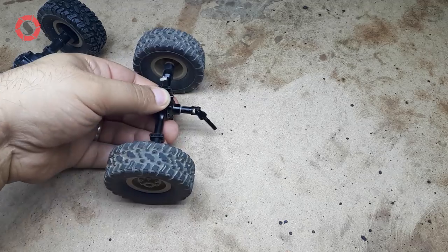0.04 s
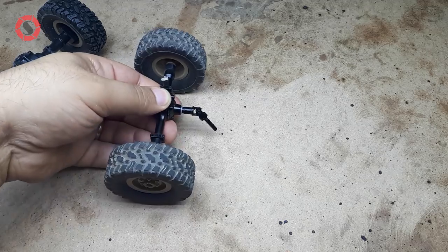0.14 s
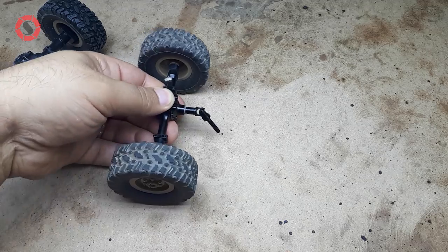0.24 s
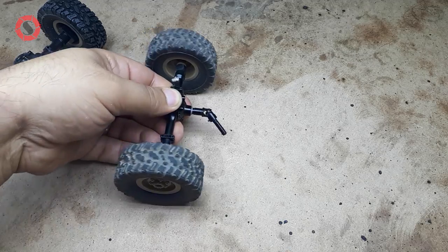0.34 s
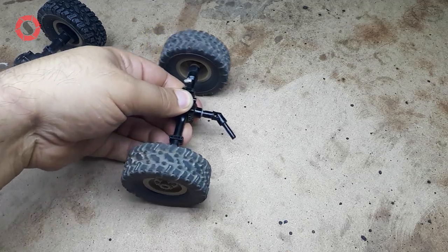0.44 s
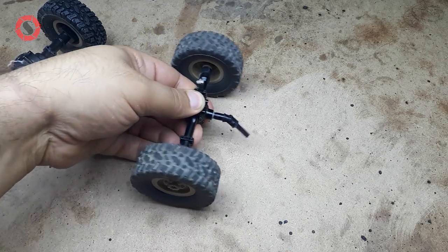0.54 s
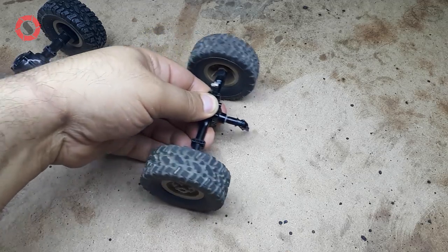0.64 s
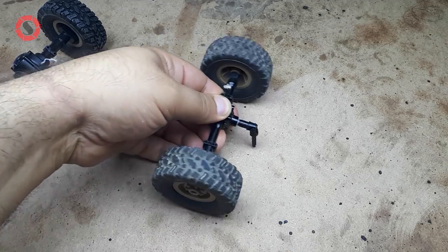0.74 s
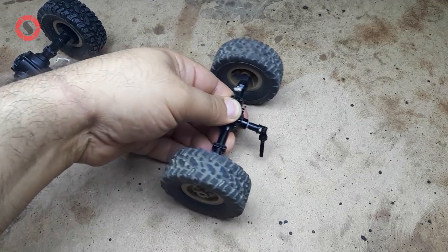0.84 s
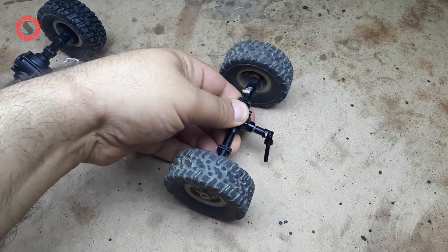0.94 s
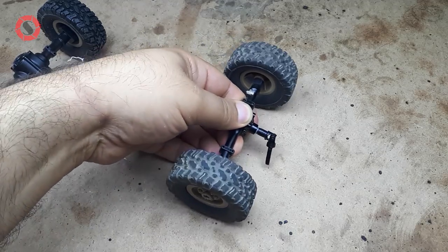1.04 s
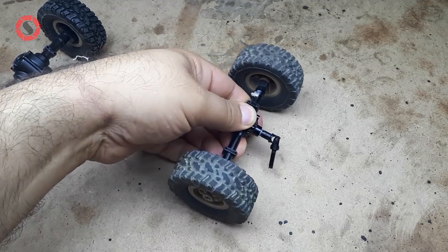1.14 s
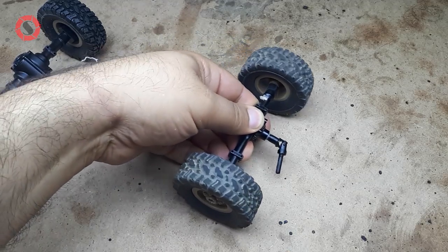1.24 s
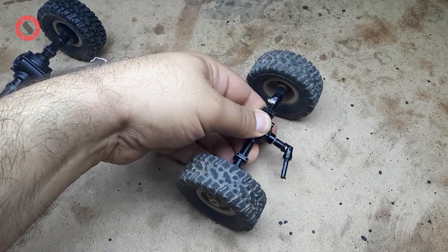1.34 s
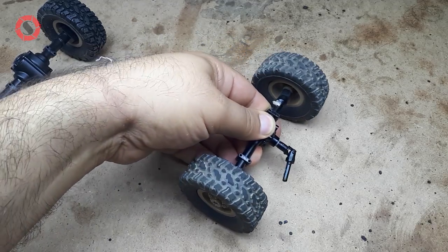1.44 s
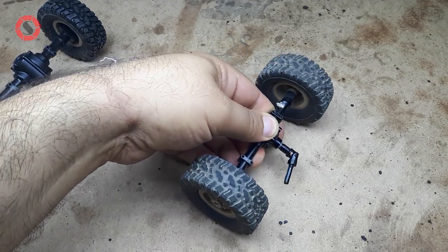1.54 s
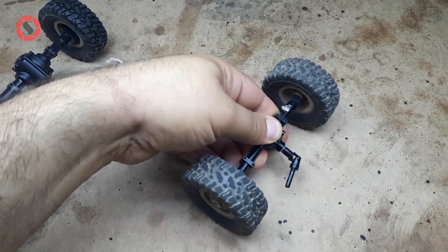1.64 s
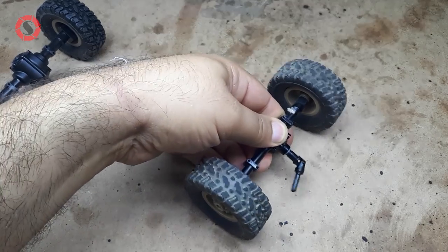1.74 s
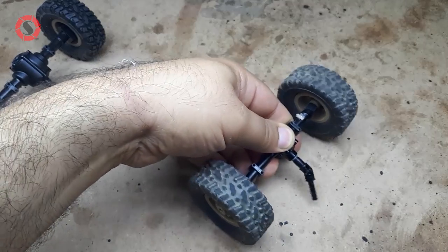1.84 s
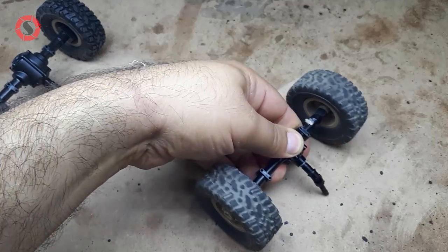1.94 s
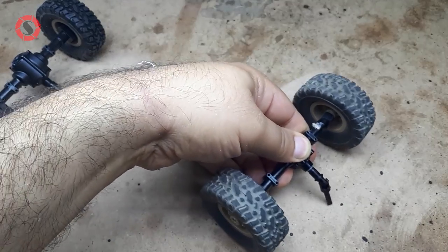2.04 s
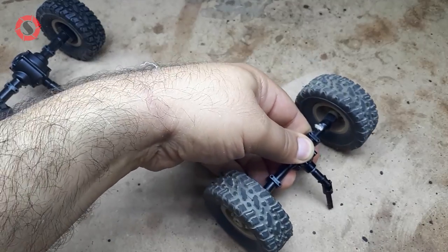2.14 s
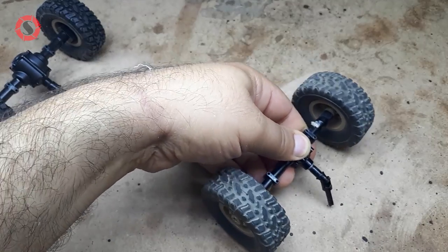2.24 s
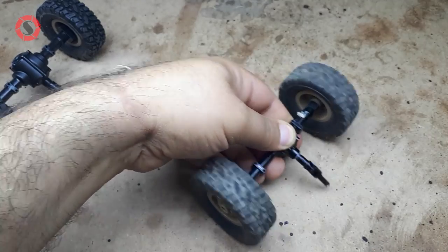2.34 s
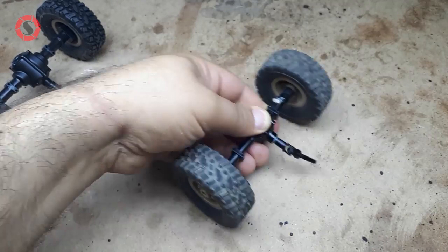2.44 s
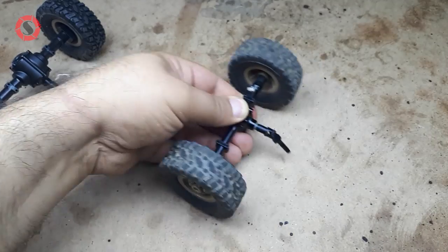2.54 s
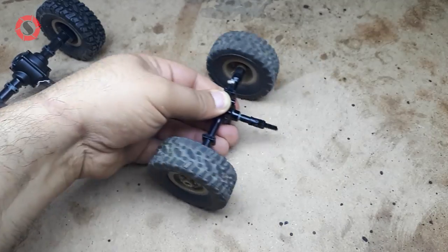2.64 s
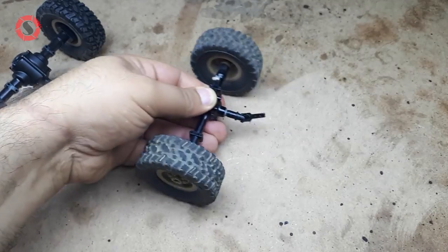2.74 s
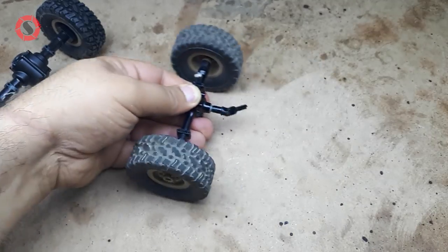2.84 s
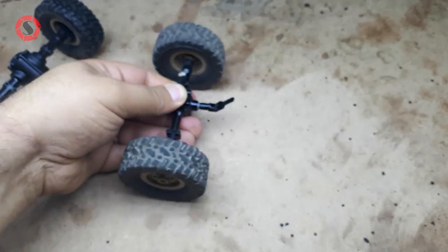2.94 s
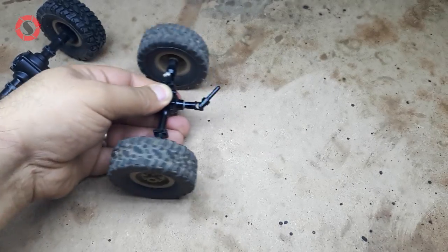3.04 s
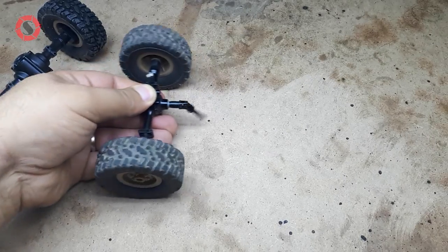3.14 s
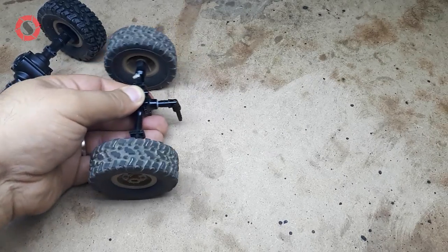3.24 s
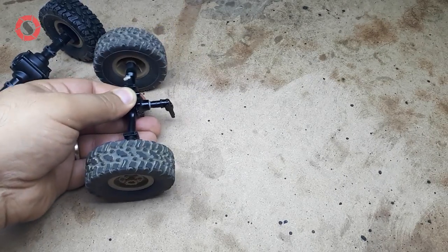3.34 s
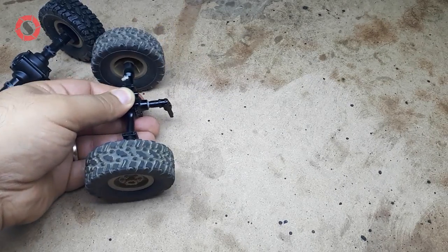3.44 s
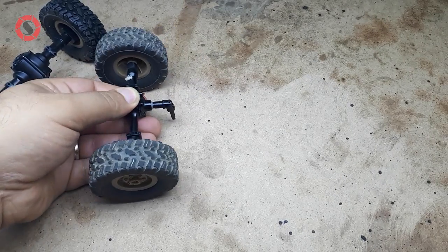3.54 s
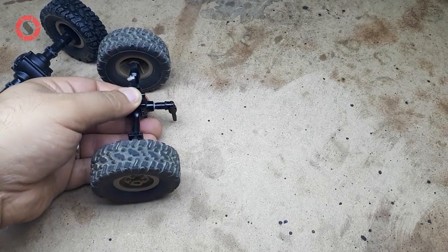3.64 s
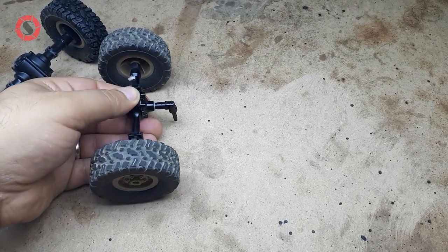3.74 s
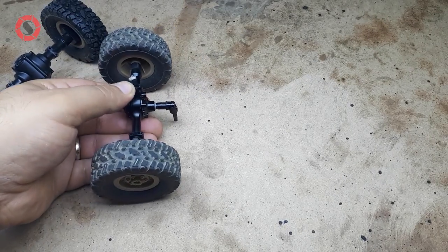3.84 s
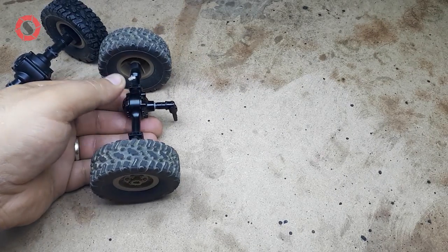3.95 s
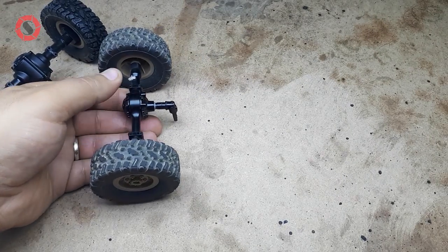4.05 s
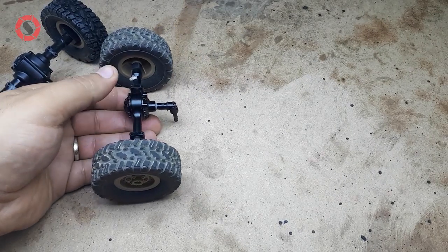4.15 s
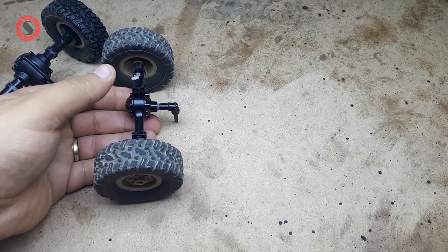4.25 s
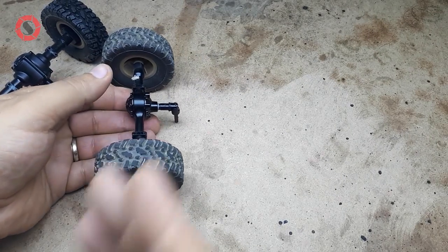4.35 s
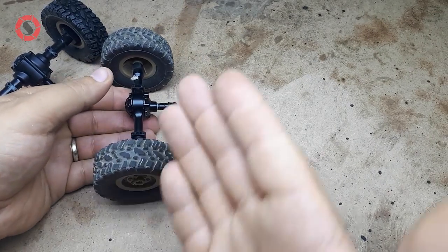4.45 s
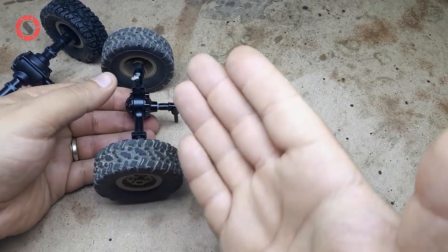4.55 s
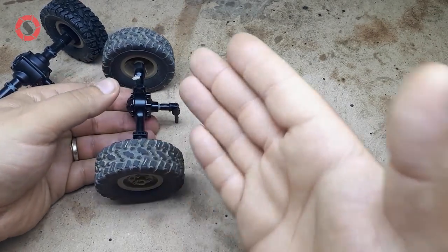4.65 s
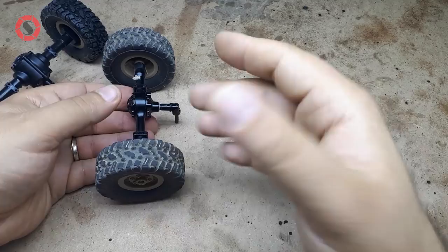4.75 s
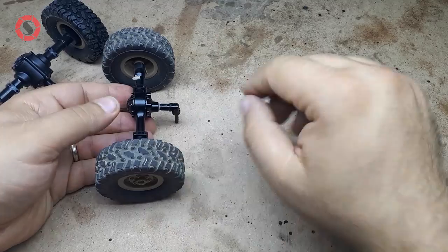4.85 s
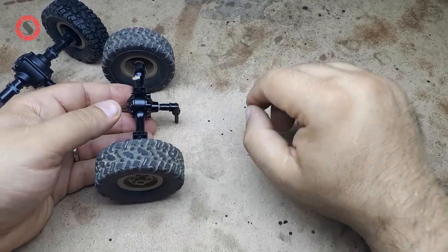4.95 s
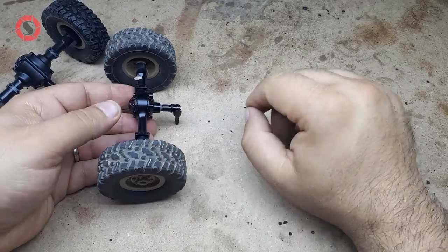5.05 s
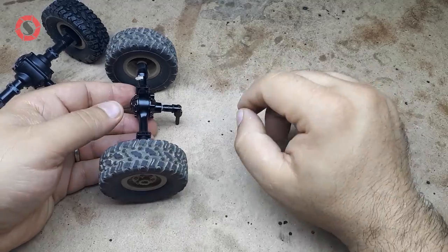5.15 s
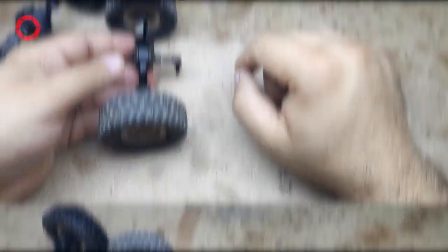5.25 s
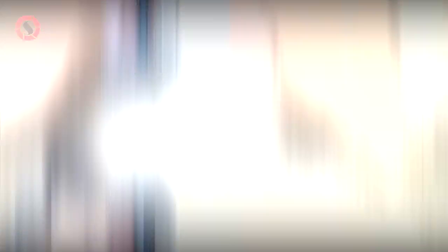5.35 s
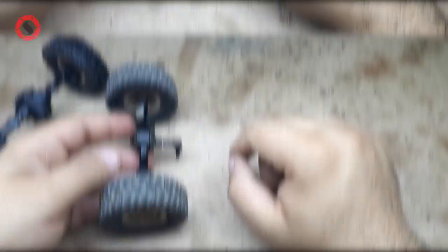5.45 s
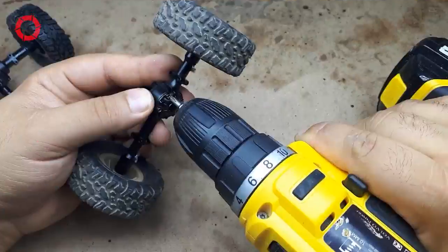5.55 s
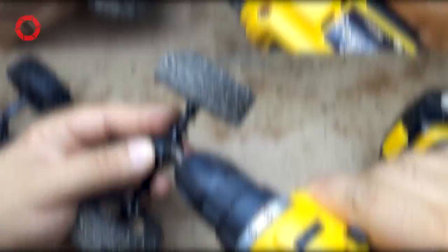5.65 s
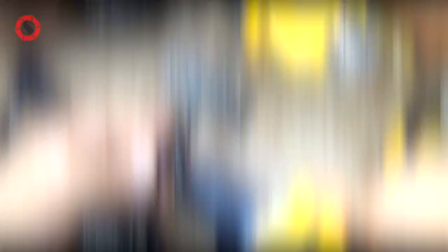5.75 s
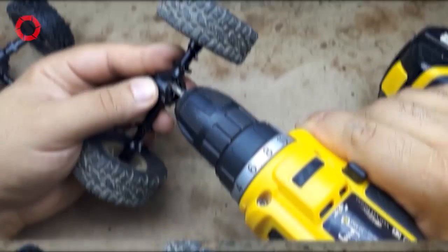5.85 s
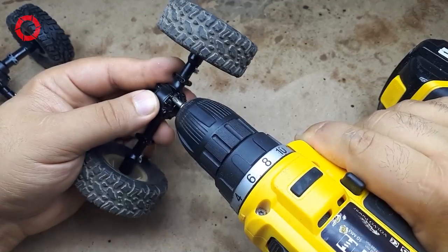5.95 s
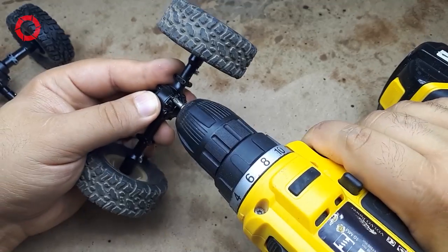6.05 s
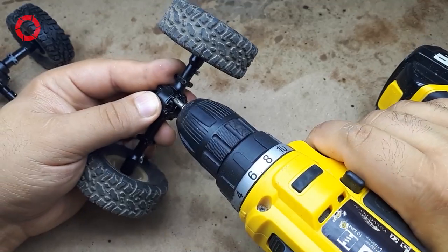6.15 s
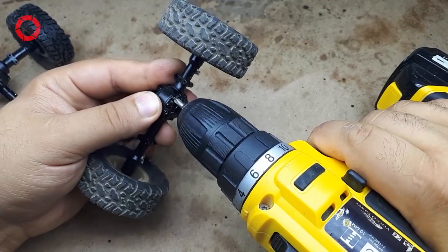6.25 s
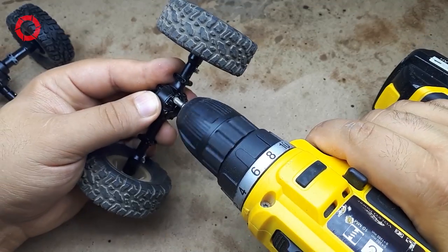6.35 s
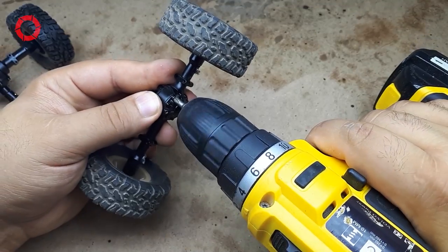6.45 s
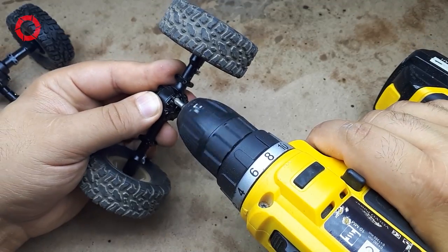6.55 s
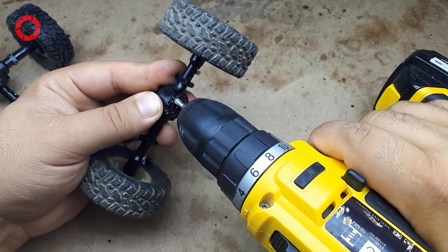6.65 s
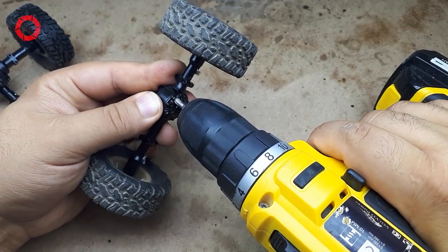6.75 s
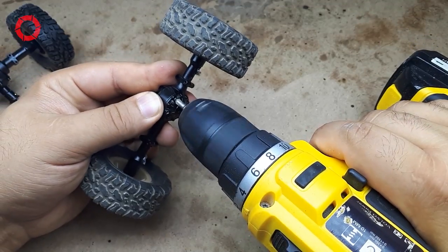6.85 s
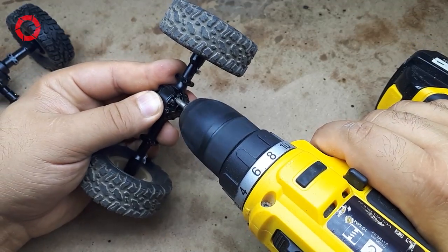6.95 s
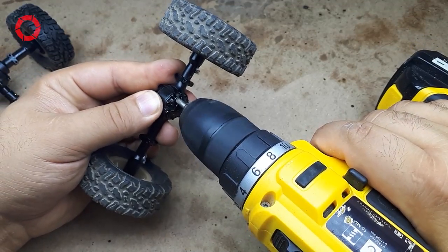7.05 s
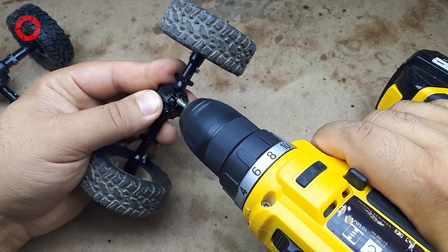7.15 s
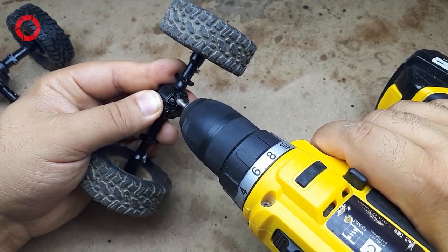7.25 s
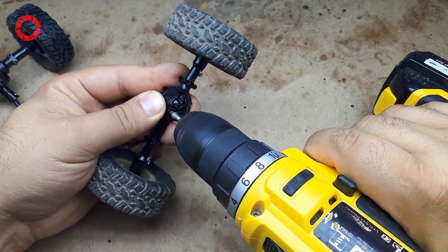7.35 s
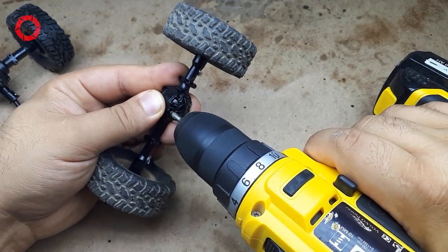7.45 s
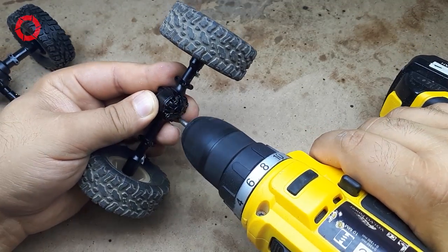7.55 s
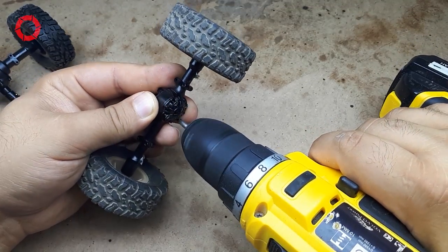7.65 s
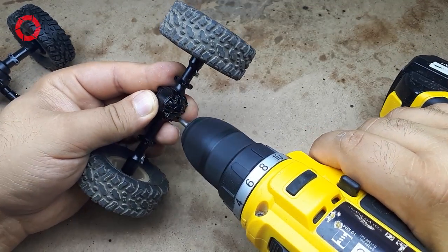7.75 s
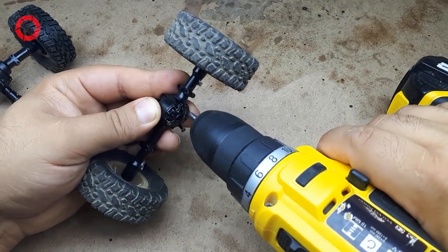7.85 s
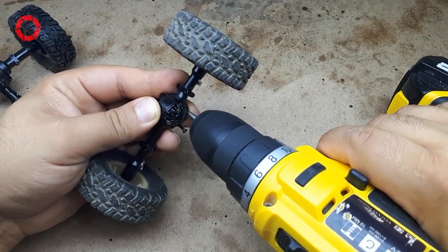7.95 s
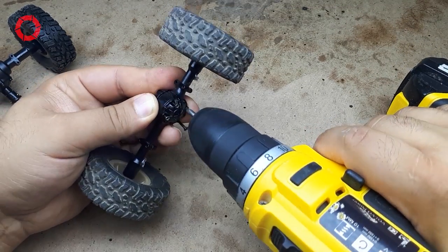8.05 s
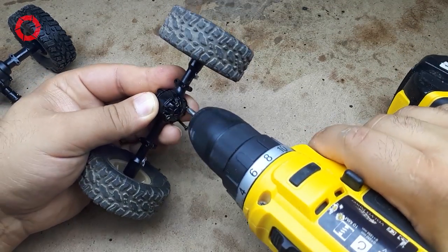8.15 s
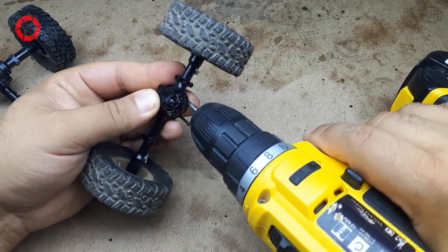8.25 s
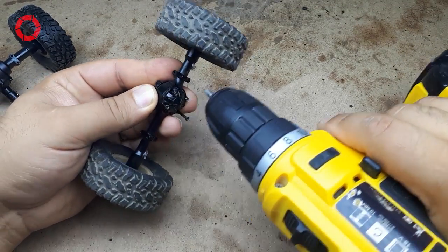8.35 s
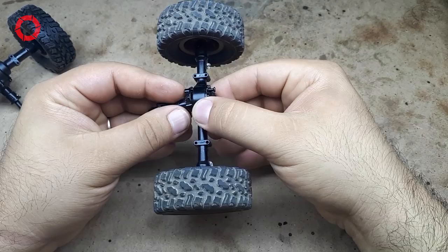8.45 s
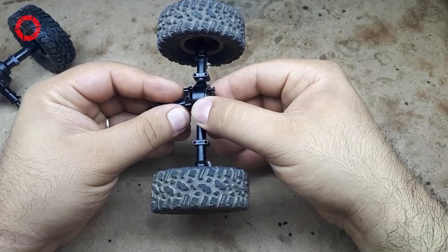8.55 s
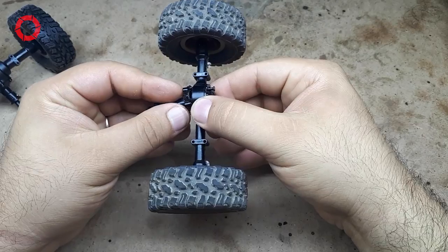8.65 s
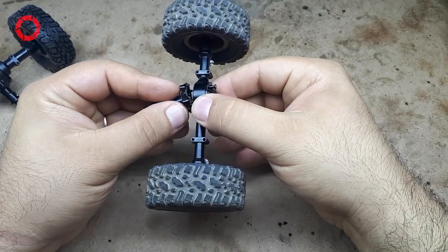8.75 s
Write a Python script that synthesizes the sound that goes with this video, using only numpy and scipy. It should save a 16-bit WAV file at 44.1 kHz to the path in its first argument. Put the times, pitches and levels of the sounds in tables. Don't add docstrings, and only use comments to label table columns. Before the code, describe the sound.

In a small room with a hard floor, hands quietly roll and drag a toy axle: grainy tyre rubs, tiny clicks, a faint squeak. Sharper knocks rattle its loose parts, then a cordless drill ticks, sings thinly and accelerates into a loud, gear-rattling whine. Abrupt cuts change its pitch before it brakes with a clunk, leaving near silence. Close stereo phone pickup, with a low hum behind.

```python
import sys
import numpy as np
from scipy import signal
from scipy.fft import rfft, irfft, next_fast_len
from scipy.io import wavfile
from scipy.ndimage import uniform_filter1d

SR = 44100
rng = np.random.default_rng(int(sys.argv[2]) if len(sys.argv) > 2 else 0)


def generate_wav(sig):
    pcm = np.round(np.clip(np.atleast_2d(sig).T, -1, 1) * 32767).astype(np.int16)
    wavfile.write(sys.argv[1], SR, pcm)


def gain_from_db(level_db):
    decades = np.asarray(level_db, float) / 20
    return 10 ** decades


N = 388060
TIME = np.arange(N) / SR
PORT_LAG_S, HANDS_LAG_S = 0.00018, 0.0001
ROOM_T60_S = 0.12


def curves(table, t):
    s, *columns = np.transpose(table)
    return [np.interp(t, s, c) for c in columns]


def unit(x):
    return x / np.sqrt(np.mean(x ** 2))


def colour(x, spectrum):
    size = next_fast_len(x.shape[-1])
    hz, db = np.transpose(spectrum)
    bins_hz = np.arange(size // 2 + 1) * SR / size
    gain = gain_from_db(np.interp(np.log(bins_hz + 1), np.log(hz), db))
    return irfft(rfft(x, size) * gain, size)[..., :x.shape[-1]]


def band(x, lo_hz, hi_hz, order=2):
    edges = [lo_hz, min(hi_hz, .45 * SR)]
    return signal.sosfilt(signal.butter(order, edges, "bandpass", fs=SR, output="sos"), x)


def resonate(x, modes):
    return sum(gain_from_db(db) * band(x, f - w / 2, f + w / 2, order=1) for f, w, db in modes)


def walk(rate, size):
    k = int(SR / rate)
    steps = np.repeat(rng.standard_normal(size // k + 1), k)
    return unit(uniform_filter1d(uniform_filter1d(steps, k), k)[:size])


def grains(per_s, spread_db):
    chance = np.clip(per_s / SR, 0, 1)
    size = rng.standard_normal(len(chance)) * gain_from_db(spread_db * rng.standard_normal(len(chance)))
    return unit((rng.random(len(chance)) < chance) * size / np.sqrt(chance))


def swells(rows, t, rise, drop_db, shape=1):
    power, coarse = 0, t[::32]
    for s, length, db in rows:
        away = np.where(coarse < s, (s - coarse) / rise, (coarse - s) / (1 - rise)) / length
        power = power + gain_from_db(2 * (db - drop_db * away ** shape))
    return np.interp(t, coarse, np.sqrt(power))


def in_room(x, wet_db, lag_s=0):
    t = np.arange(int(.35 * SR)) / SR
    shared, left, right = rng.standard_normal((3, len(t))) * gain_from_db(-60 * t / ROOM_T60_S) * (t > .0015)
    treble = np.array([band(left, 700, 16000), band(right, 700, 16000)])
    walls = band(shared, 150, 900) + treble
    walls *= gain_from_db(wet_db) / np.sqrt(np.sum(walls ** 2) / 2)
    walls[0, int(lag_s * SR)] += 1
    walls[1, 0] += 1
    return signal.fftconvolve(x[None], walls, axes=1)[:, :len(x)] / np.sqrt(1 + gain_from_db(2 * wet_db))


CUTS = [5.986, 7.352, 7.618, 7.852, 8.118, 8.8]
# [t/s, start f/Hz, free f/Hz, lag/s, gear clatter level/dB]
SPIN_UPS = [
    (6.86, 290, 572.4, 0.18, -33),
    (7.356, 569.6, 686.2, 0.2, -32),
    (7.622, 583.5, 650.3, 0.11, -32),
    (7.855, 435.6, 600.6, .23, -33),
    (8.118, 410.4, 382, 0.038, -34.5),
]
# [commutator level/dB, gear mesh level/dB, pinion level/dB]
LINE_MIX = [(1.5, -1, -21), (-1, -7, -2), (-1, -7, 0), (-1, -4, -12), (2, -11, -19)]
# [t/s, level/dB]
POPS = [(7.3529, -24.5), (7.616, -31), (7.85, -45.5), (8.119, -36.5)]
SPLICE_S, POP_S = .003, 0.00036


def shots():
    out = np.zeros((2, N))
    for start, end, spin_up, mix in zip(CUTS, CUTS[1:], SPIN_UPS, LINE_MIX):
        a, b = int(start * SR) - SR // 4, min(int(end * SR) + SR // 100, N)
        t = TIME[a:b]
        fade_in = np.clip((t - start) / SPLICE_S + .5, 0, 1)
        fade_out = np.clip((end - t) / SPLICE_S + .5, 0, 1)
        out[:, a:b] += drill(t, spin_up, mix) * fade_in * fade_out
    for s, db in POPS:
        out -= gain_from_db(db) * np.exp(-((TIME - s) / POP_S) ** 2)
    out[:, 6 * SR:8 * SR] += chopper(TIME[6 * SR:8 * SR])
    return out


# [rotor f/Hz, clatter level/dB, boom level/dB, hiss level/dB; last two relative]
BY_SPEED = [(34, -35.5, 1, -13), (92, -18, -1, 17), (187.5, -6.5, -3, -11), (328.5, -2, -14, -12.5),
            (667, 0, -10, -7.5)]
# [t/s, length/s, clatter level/dB, relative boom level/dB]
JOLTS = [
    (6.167, 0.029, -53, -45),
    (6.29, 0.21, -59, 10),
    (8.186, 0.019, -59, 27),
    (8.224, 0.22, -60, -1.5),
]
# [f/Hz, left minus right level/dB]
FACING = [(60, -1.5), (110, 6.5), (200, 6.5), (380, -4), (700, 1.5), (1290, -1.5), (2380, 0.5), (4400, -1),
          (8120, -9.5), (15000, -1)]
BRAKE_S, BRAKE_DB_PER_S = 8.17, 1800
COAST_DB, COAST_DB_PER_S = -16.5, 67
ROOM_DB, RUMBLE_DB = 6, -31
BLUR_HZ = 170


def drill(t, spin_up, mix):
    *climb, clatter_db = spin_up
    hz = speed(t, *climb)
    turns = np.cumsum(hz) / SR
    fast = fastness(hz)
    gear_db, boom_db, hiss_db = at_speed(BY_SPEED, hz)
    running = t > CHOPPER[0][0]
    braked = np.maximum(t - BRAKE_S - .008, 0)
    brake_db = np.maximum(-BRAKE_DB_PER_S * braked, COAST_DB - COAST_DB_PER_S * braked)
    level = gain_from_db(clatter_db + gear_db + brake_db) * running
    jolt = swells([(s, d, db) for s, d, db, low in JOLTS], t, 0.43, 30) * running
    thud = swells([(s, d, db + low) for s, d, db, low in JOLTS], t, 0.43, 30) * running

    boom_level = level * gain_from_db(boom_db + 2.0) * np.clip(hz / BLUR_HZ, .5, 1) + thud
    body = gear_grind(turns, hz) * (level + jolt) + housing_boom(hz) * boom_level
    body += gain_from_db(RUMBLE_DB) * unit(band(rng.standard_normal(len(t)), 55, 170)) * level * fast ** 2
    body += brush_hiss(turns, hz) * gain_from_db(hiss_db - 2.0) * level
    out = in_room(body, ROOM_DB, PORT_LAG_S)
    out += in_room(whine(turns, hz, mix) * level, -6, PORT_LAG_S)
    out += in_room(crawl(t, turns, hz) * level, -9, PORT_LAG_S)
    sides = [[(f, side * db / 2) for f, db in FACING] for side in (1, -1)]
    out = np.array([colour(x, facing) for x, facing in zip(out, sides)])
    return out + unbalance(turns, hz)


def at_speed(table, hz):
    return curves([(np.log(f), *db) for f, *db in table], np.log(hz))


def fastness(hz):
    return np.clip(hz / 260, 0, 1)


def once_a_turn(turns):
    return 1 + 0.7 * np.cos(2 * np.pi * turns)


# [t/s, rotor f/Hz]
CREEP = [(6.15, 30), (6.3, 50), (6.45, 54.5), (6.58, 68), (6.7, 97), (6.78, 125), (6.82, 190)]
BRAKE_HZ_PER_S, REST_HZ = 4800, 25.25


def speed(t, s, start_hz, free_hz, lag_s):
    creep, = curves(CREEP + [(s, start_hz)], t)
    climb = free_hz - (free_hz - start_hz) * np.exp(-np.maximum(t - s, 0) / lag_s)
    braking = BRAKE_HZ_PER_S * np.maximum(t - BRAKE_S, 0)
    return np.maximum(np.where(t < s, creep, climb) - braking, REST_HZ)


# [f/Hz, level/dB per Hz]
GEARS = [(700, -31.5), (1100, -5.5), (1370, -2), (1600, -3), (2400, -2.5), (3400, 2), (4600, -2.5),
         (6200, -3), (7800, -6.5), (8600, -10.5), (9500, -58.5)]
SLOW_GRIND_DB = -1


def gear_grind(turns, hz):
    teeth = grains(2500 + 10 * hz, spread_db=5.0)
    grind = unit(colour(teeth * once_a_turn(turns), GEARS))
    slow_grind = gain_from_db(SLOW_GRIND_DB) * (1 - fastness(hz)) * band(grind, 1360, 4400)
    return (grind + slow_grind) * gain_from_db(-1.0)


# [f/Hz, width/Hz, level/dB]
HOUSING = [(420, 81, -44), (582, 44, -1), (663.5, 75, 2.5), (866, 150, -4), (1380, 180, -14.5)]


def housing_boom(hz):
    return unit(band(resonate(grains(350 + 4 * hz, spread_db=2.5), HOUSING), 220, 6000, order=4))


# [f/Hz, level/dB per Hz]
BRUSH = [(7000, -29), (8500, -4), (10000, -6), (11100, -2), (12500, -10.5), (14000, -8), (15600, -6),
         (16000, -22.5)]
HISS_STARTS_HZ = 76


def brush_hiss(turns, hz):
    hiss = unit(colour(rng.standard_normal(len(hz)) * once_a_turn(turns), BRUSH))
    return hiss * fastness(hz) ** 3 * np.clip(hz / HISS_STARTS_HZ - 1, 0, .5) * 2


# [multiple of rotor rate, level/dB below the singing speed, level/dB above it]
COMMUTATOR = [(2, -7, -11), (3, -8, -9), (4, -22, -14), (5, -23, -23), (6, -19, -5.5), (7, -22, -21),
              (8, -24, -16), (9, -22, -17), (10, -24, -16), (11, -24, -15), (12, -24, -11), (13, -18, -17),
              (14, -20, -22), (15, -22, -20), (16, -21, -17), (17, -25, -22), (18, -26, -17),
              (19, -23, -20), (20, -25, -26), (21, -25, -27), (22, -24, -27)]
# [multiple of mesh rate, level/dB]
MESH = [(1, -20), (2, -13), (3, -9), (4, -6), (6, -23), (10.18, -17), (11.73, -15), (12, -13), (12.3, -17),
        (15.75, -14), (16, -16), (16.3, -18)]
# [multiple of mesh rate, level/dB]
RING_GEAR = [(8, -1)]
# [multiple of rotor rate, level/dB]
PINION = [(1.5, -18), (1.535, -13), (1.59, -15), (6.54, -17)]
# [f/Hz, level/dB]
SHELL = [(1700, -2), (2400, 0.5), (2850, 5), (3150, -8), (3450, 8.5), (3850, -9), (4200, 5), (4600, -2),
         (5000, 6), (7900, 2), (8400, -8), (9800, -5), (10200, 6.5), (11300, 6.5), (11800, -5.5)]
MESH_RATIO, SING_HZ = 7 / 9, 562


def whine(turns, hz, mix):
    commutator_gain, mesh_gain, pinion_gain = gain_from_db(mix)
    brushes = [(k, np.where(hz < SING_HZ, slow, quick)) for k, slow, quick in COMMUTATOR]
    tones = commutator_gain * lines(turns, brushes, hz)
    tones += mesh_gain * lines(MESH_RATIO * turns, MESH, hz)
    tones += pinion_gain * lines(turns, PINION, hz)
    tones += mesh_gain * band(lines(MESH_RATIO * turns, RING_GEAR, hz), 2300, 3500)
    shell = colour(band(tones, 800, 18000), SHELL) * gain_from_db(-2.0)
    housing = resonate(tones, HOUSING) * gain_from_db(2.0)
    return (shell + housing) * np.clip(hz / 340, 0, 1) ** 2 * fastness(hz)


def lines(turns, table, hz):
    turns = turns + .015 * walk(55, len(turns))
    out = 0
    for k, db in table:
        level = gain_from_db(db - 1.0 + 2.8 * walk(24, len(turns))) * np.sqrt(2)
        out = out + level * np.sin(2 * np.pi * (k * turns + rng.random())) * (k * hz < 15500)
    return out


# [rotor f/Hz, level/dB]
UNBALANCE = [(190, -94), (290, -71), (341, -44.5), (430, -45.5), (520, -30), (585, -24.5), (628, -26.5),
             (637, -37), (655, -38)]


def unbalance(turns, hz):
    tone_db, = at_speed(UNBALANCE, hz)
    lag = np.array([[PORT_LAG_S], [0]])
    level = np.sqrt(2) * gain_from_db(tone_db + 0.28 * walk(46, len(hz))) * (hz > UNBALANCE[0][0])
    return level * np.sin(2 * np.pi * (turns - lag * hz + rng.random()))


LURCH_S, POLES, LURCH_DB, TICK_DB = 6.431, 3, 6, -4


def crawl(t, turns, hz):
    turns = turns - np.interp(LURCH_S, t, turns)
    crawling = (hz < BLUR_HZ) & (t > 6.33) & (t < BRAKE_S)

    def blows(per_turn):
        count = np.floor(per_turn * turns + .05 * walk(40, len(t)))
        strength = gain_from_db(2.5 * rng.standard_normal(len(t)))
        return np.diff(count, prepend=0).clip(0, 1) * strength * crawling

    def level_while_crawling(x):
        return x / np.sqrt(np.sum(x ** 2) / (1 + crawling.sum()) + 1e-18)

    lurch = blows(0.99)
    lurch = band(lurch, 500, 760) + .6 * band(lurch, 780, 1000)
    ticks = blows(POLES)
    ticks = band(ticks, 4000, 4700) + 0.65 * band(ticks, 2200, 2900) + 0.3 * band(ticks, 5000, 7500)
    out = gain_from_db(LURCH_DB) * level_while_crawling(lurch) + gain_from_db(TICK_DB) * level_while_crawling(ticks)
    return out * np.clip(1 - (hz / BLUR_HZ) ** 2, 0, 1)


# [t/s, f/Hz, level/dB, cogging beats f/Hz, their depth 0-1]
CHOPPER = [
    (6.151, 3402, -57, 45, .6),
    (6.205, 3547, -55.5, 125, .45),
    (6.339, 3413, -55.5, 112, .6),
    (6.591, 3550, -55.5, 138, .4),
    (6.66, 3550, -55.5, 206, .3),
    (6.801, 3500, -54, 260, .2),
    (6.88, 3570, -58, 260, .2),
    (6.93, 3500, -100, 260, .2),
]
CHOPPER_OVERTONES_DB = (-63.5, -72, -72.5)
DUTY_FULL_S, OVERTONE_FADE_DB_PER_S = 6.65, (49, 27, 19.5)
FIZZ_DB, COG_DEPTH = -77, (.35, .2, .6, 1.7)


def chopper(t):
    steps = np.array(CHOPPER)
    rows = steps[np.maximum(np.searchsorted(steps[:, 0], t) - 1, 0)]
    _, hz, db, cog_hz, cog_depth = uniform_filter1d(rows, size=120, axis=0).T
    turns = np.cumsum(hz * (1 + 0.0005 * walk(90, len(t)))) / SR
    cog = np.cos(2 * np.pi * np.cumsum(cog_hz * (1 + .06 * walk(15, len(t)))) / SR) * cog_depth
    dbs = [db]
    for overtone_db, fade in zip(CHOPPER_OVERTONES_DB, OVERTONE_FADE_DB_PER_S):
        dbs.append(overtone_db - fade * np.maximum(t - DUTY_FULL_S, 0))
    tone = 0
    for k, line_db in enumerate(dbs):
        level = gain_from_db(line_db + 0.55 * walk(40, len(t))) * (1 + COG_DEPTH[k] * cog)
        tone = tone + level * np.sqrt(2) * np.sin(2 * np.pi * (k + 1) * turns)
    fizz_band = [(8800, -60.0), (9700, -6.0), (11500, -3), (11900, -70)]
    tone += gain_from_db(FIZZ_DB) * unit(colour(grains(np.full(len(t), 4000.), spread_db=3.5), fizz_band))
    return in_room(tone * (t > CHOPPER[0][0]) * (t < CHOPPER[-1][0]), -15)


# [t/s, peak level/dB, ring share 0-1, brightness f/Hz, loudest part f/Hz]
KNOCKS = [
    (0.097, -53, 0.2, 2240, 1500),
    (1.656, -56, 0.4, 3930, 1650),
    (2.503, -52, 0.4, 7050, 790),
    (5.055, -39.5, 0.34, 2930, 2520),
    (5.064, -33, 0.54, 2370, 1660),
    (5.24, -40, 0.9, 4730, 1860),
    (5.418, -33.5, 0.56, 4370, 2360),
    (5.432, -27, 0.39, 2940, 1840),
]
# [f/Hz, width/Hz, level/dB]
AXLE = [(270, 40, -4), (560, 80, -6), (1163, 60, -14), (1836, 30, 1), (2700, 28, 0), (3800, 90, -18),
        (5130, 90, -20)]


def knocks():
    out = np.zeros((2, N + SR))
    t = np.arange(SR // 4) / SR
    for s, db, share, bright_hz, part_hz in KNOCKS:
        blow = rng.standard_normal(len(t)) * (np.exp(-t / 0.004) + 0.19 * np.exp(-t / 0.058))
        strike = band(.5 * blow + 6 * (t == 0), 150, 1.3 * bright_hz)
        parts = AXLE + [(part_hz, 60, 3)]
        ring = sum(gain_from_db(g) * band(strike, f - w / 2, f + w / 2, order=1) / w ** .5 for f, w, g in parts)
        crack = band(blow, 290, bright_hz, order=3)
        hit = share * ring / abs(ring).max() + .6 * (1 - share) * crack / abs(crack).max()
        a = int(s * SR)
        out[:, a:a + len(t)] += gain_from_db(db) * in_room(hit, -7) * gain_from_db(np.array([[1.2], [-1.2]]))
    return out[:, :N]


# [t/s, peak level/dB, centre
# f/Hz]
TICKS = [(1.035, -49, 94), (1.709, -45, 2140), (6.031, -57.5, 4100), (6.071, -49.5, 5340),
         (6.15, -34.5, 4850), (6.177, -32, 3250), (6.192, -38.5, 870), (6.281, -42, 2200),
         (8.18, -25.5, 646), (8.319, -54.5, 2017), (8.76, -68, 3040),
         (.472, -63, 2150), (.587, -52, 5500), (.662, -53, 2280), (.803, -65, 2600), (.888, -55.5, 5400),
        (1.217, -57, 870), (1.276, -54, 810), (1.357, -56, 860), (1.654, -47, 1700), (1.712, -51, 825),
        (1.711, -49, 6360), (1.809, -58, 800), (1.879, -61, 7000), (2.504, -54, 910), (2.89, -50, 5360),
        (2.889, -47, 3060), (2.892, -51, 1940), (2.898, -45, 2240), (3.223, -38, 2220), (2.498, -47, 800),
        (2.617, -43, 3000), (2.632, -43, 3550), (2.646, -45, 3000), (2.068, -63, 2500), (1.902, -55, 800),
        (3.232, -41, 1760), (6.033, -64, 1890), (6.283, -36, 1600), (8.322, -59, 800), (8.761, -66, 1090),
        (8.763, -66.5, 4120)]


def ticks_and_grit():
    out = np.zeros((2, N + SR))
    t = np.arange(SR // 4) / SR
    for s, db, hz in TICKS:
        noise = unit(band(rng.standard_normal(len(t)), 0.744 * hz, 1.37 * hz))
        tick = noise * np.exp(-t * hz ** .5 / 0.11)
        a = int(s * SR)
        out[:, a:a + len(t)] += gain_from_db(db) * in_room(.5 * tick, -0.5)
    return out[:, :N]


# [t/s, peak level/dB, f/Hz, t60/s]
TAPS = [(5.783, -51.5, 2050, 0.059), (5.789, -48.5, 1650, 0.025), (5.79, -48.5, 740, 0.078),
        (5.8, -60, 2110, 0.037), (5.802, -55, 693, 0.056), (6.375, -51.5, 120, 0.15),
        (6.282, -39.5, 648, .05), (6.295, -45, 650, .07), (6.314, -47, 760, .04), (6.32, -42, 800, .04),
        (1.652, -60, 1770, .06), (3.83, -72, 1480, 0.45)]


def taps():
    out = np.zeros((2, N + SR))
    t = np.arange(SR // 4) / SR
    for s, db, hz, t60 in TAPS:
        mode = np.sin(2 * np.pi * hz * t) * gain_from_db(-60 * t / t60) * (1 - 4 * t)
        a = int(s * SR)
        out[:, a:a + len(t)] += gain_from_db(db) * in_room(mode, -13.0)
    return out[:, :N]


# [peak t/s, length/s, level/dB, thud level/dB, rasp level/dB
SCUFFS = [(0.493, 0.22, -59, -11, -1), (0.678, 0.2, -61, -11.5, 0), (0.803, 0.11, -68.5, 0.5, 4.5),
          (0.965, 0.2, -65, -1.5, 0.5), (1.105, 0.085, -64.5, 1.5, 0), (1.218, 0.1, -71.5, 7.5, 3.5),
          (1.275, 0.1, -69.5, 7.5, 2), (1.36, 0.12, -70.5, 3, 6), (1.502, 1, -79, 4, 2.5),
          (1.668, 0.12, -60, -0.5, -5), (1.827, 0.15, -63, -1, 0), (1.91, 0.078, -77, 9, 5),
          (2.068, 0.038, -70.5, 5, -7),
          (2.517, 0.12, -55, -1.5, 1), (2.568, 0.49, -57.5, -4, -4.5), (2.633, 0.13, -51, -17, -4.5),
         (2.74, 0.69, -70.5, -11, 3.5), (2.825, 0.17, -63.5, -7, 2), (2.904, 0.14, -61, -8, 2),
         (2.97, 1, -65.5, -7, 3), (3.164, 0.24, -61, -6, -0.5), (3.25, 0.34, -57, -10, -2.5),
         (3.33, 0.36, -66, -2, -1), (3.52, 1, -79.5, 2.5, -10.5), (3.71, 0.21, -74.5, -7, -8),
         (3.93, 0.97, -74, -2.5, -13.5), (4.095, 0.087, -69, -3, -14)]
SHIVERS = [
    (5.07, 0.14, -64, -6, -31),
    (5.25, 0.2, -59.5, -6.5, -17),
    (6.5, 0.15, -53, -5.5, -11),
    (5.8, 0.039, -83.5, 25.5, 6),
    (5.08, 0.49, -80.5, 7, -3.5),
]
# [f/Hz, level/dB per Hz]
SCUFF_COLOUR = [(260, -66), (480, -8.5), (780, 4), (1150, -5.5), (1700, -1), (2200, -0.5), (2900, -6),
                (3500, -13), (4500, -10), (5600, -13.5), (7000, -8.5), (8000, -17.5), (10000, -26),
                (15800, -33)]
# [f/Hz, width/Hz, level/dB]
RATTLE = [(340, 200, -5), (1850, 60, 2), (2700, 70, -5), (5100, 300, -11)]
SCUFF_RISE, SHIVER_RISE, SCUFF_DROP_DB = 0.46, .025, 34
BRISK_S, BRISK_TOP, BRISK_SHARE = .25, 2.2, .66


def scuff():
    t = TIME[:6 * SR]
    contacts = grains(np.full(len(t), 3500.), spread_db=3.0)
    blocks_hz = 400 * 1.2 ** np.arange(21)
    rub = sum(band(contacts, hz, 1.2 * hz) * gain_from_db(.9 * walk(25, len(t))) for hz in blocks_hz)
    rub = colour(rub, SCUFF_COLOUR)
    low, lower = (colour(rub, [(hz / 1.2, 0), (hz * 1.2, -40)]) for hz in (3800, 1300))

    def part(rows, k, rise, shape=1):
        events = [(s, d, db + (thud, 0, rasp)[k]) for s, d, db, thud, rasp in rows]
        return swells(events, t, rise, SCUFF_DROP_DB, shape)

    rubs = SCUFFS
    brisk = [(s, d * BRISK_SHARE, db - 2.0, *rest) for s, d, db, *rest in rubs if d < BRISK_S]
    slow = [row for row in rubs if row[1] >= BRISK_S]
    out = 0
    for k, x in enumerate((lower, low - lower, rub - low)):
        power = part(brisk, k, SCUFF_RISE, BRISK_TOP) ** 2 + part(slow, k, SCUFF_RISE) ** 2
        power += part(SHIVERS, k, SHIVER_RISE) ** 2
        out = out + unit(x) * np.sqrt(power) * gain_from_db(0.5 * walk(32, len(t)))
    rattle = unit(resonate(grains(np.full(len(t), 400.), spread_db=6.0), RATTLE))
    out += rattle * part(SHIVERS, 1, SHIVER_RISE) * gain_from_db(-10.0)
    return np.pad(in_room(out, 1.0, HANDS_LAG_S), ((0, 0), (0, N - len(t))))


# [t/s, f/Hz, level/dB]
SQUEAK = [
    (1.02, 770, -97),
    (1.035, 770, -71),
    (1.18, 775, -72),
    (1.21, 770, -95),
]


def squeak():
    hz, db = curves(SQUEAK, TIME)
    phase = 2 * np.pi * np.cumsum(hz) / SR
    tone = np.sin(phase) + .7 * np.sin(2 * phase)
    return in_room(gain_from_db(db + 3.5 * walk(50, N)) * tone * (db > -94), -3.0)


# [peak t/s, length/s, level/dB, f/Hz, width as share of f]
STROKES = [(0.498, 0.092, -61.5, 2130, 0.082), (0.503, 0.18, -66.5, 647, 0.18),
           (0.684, 0.066, -56, 2380, 0.31), (1.673, 0.051, -71, 1700, .12), (1.83, 0.083, -63, 824, 0.1),
           (2.525, 0.22, -59.5, 905, 0.52), (2.574, 0.27, -57.5, 1440, 0.34),
           (2.638, 0.14, -55.5, 2640, 0.43), (2.907, .07, -58.5, 2080, 0.22), (2.968, .25, -65, 5600, 0.15),
           (3.25, 0.23, -57.5, 1690, 0.14), (3.253, 0.16, -59, 2950, 0.11), (5.052, 0.85, -79, 4800, 0.072),
           (5.076, 0.15, -53, 286, 0.42), (5.07, 0.067, -52, 810, 0.092), (5.067, 0.23, -62, 2680, 0.063),
           (5.247, 0.18, -52, 1805, 0.078), (5.446, 0.18, -58.5, 355, 0.59),
           (5.445, 0.18, -61.5, 1860, 0.037), (5.786, 0.027, -54, 1940, .3),
           (8.184, 0.084, -39.5, 605, 0.11)]
# [from t/s, to t/s, level/dB, f/Hz]
SCRAPES = [(5.43, 5.618, -74, 4030), (5.43, 5.618, -72, 5100), (5.43, 5.618, -75, 6600),
           (5.43, 5.53, -66, 1860), (5.43, 5.51, -68, 2500), (5.06, 5.155, -67.5, 2570),
           (2.675, 2.86, -71, 4600), (3.13, 3.35, -75, 6600), (1.47, 1.585, -77, 6900),
           (1.26, 1.3, -72, 550)]
STROKE_DROP_DB = 36


def strokes():
    out = np.zeros(N)
    for s, length, db, hz, share in STROKES:
        a = max(int((s - .5) * SR), 0)
        t = TIME[a:a + SR]
        edge = 1 + np.clip(share, .02, .8) / 2
        rub = unit(band(grains(np.full(len(t), 2500.), spread_db=3.0), hz / edge, hz * edge))
        if s > KNOCKS[3][0]:
            gain = swells([(s, length, db)], t, SHIVER_RISE, STROKE_DROP_DB, 0.74)
        else:
            gain = swells([(s, length * BRISK_SHARE, db - 1.0)], t, 0.44, STROKE_DROP_DB, BRISK_TOP)
        out[a:a + SR] += rub * gain
    for start, end, db, hz in SCRAPES:
        a, b = int(start * SR), int(end * SR)
        contacts = grains(np.full(SR // 2, 2500.), spread_db=-1.0)
        rub = unit(band(contacts, hz / 1.035, hz * 1.035))[:b - a]
        out[a:b] += gain_from_db(db) * rub * signal.windows.tukey(b - a, .15) * np.linspace(1.3, .7, b - a)
    return in_room(out, -3.5, HANDS_LAG_S)


# [f/Hz, level/dB per Hz]
AIR = [(12, -39.5), (20, -18), (88, -3), (168, -14), (198, -12.5), (228, -17), (347, -14.5), (446, -20.5),
       (660, -18.5), (738, -21), (1150, -23.5), (5380, -34), (16000, -36)]
# [level/dB, middle level/dB, top end level/dB]
AIR_SHOTS = [
    (-66, -5, -3),
    (-75, -6, -40.5),
]
# [peak t/s, length/s, level/dB]
THROBS = [(.04, 0.13, -66), (.25, 0.63, -72), (.61, 0.4, -71), (1.05, 0.11, -53.5), (1.25, 0.67, -68),
          (1.53, 0.65, -69), (2.05, 0.97, -63), (2.23, 0.23, -61), (2.44, 0.27, -56), (2.65, 0.96, -68),
          (3.03, 0.98, -62), (3.51, 0.54, -60), (3.86, 0.31, -64.5), (4.11, 0.4, -65.5), (5.12, .4, -69),
          (5.41, 0.18, -59)]
HUM_HZ, HUM_DB = 195.4, -77.5
THROB_DROP_DB, DRONE_DB = 23.5, -84.5
DUCK_S, DUCK_DB_PER_S = 8.1, 4


def air():
    opposed = np.array([[1], [-1]])
    mid, side = colour(rng.standard_normal((2, N)), AIR)
    side = .35 * side + .65 * band(side, 500, 18000)
    tone = unit(mid + side * opposed) * gain_from_db(.5 * opposed)
    db, middle_db, top_db = np.transpose(AIR_SHOTS)[:, 1 * (TIME > CUTS[0])]
    duck_db = -DUCK_DB_PER_S * np.maximum(TIME - DUCK_S, 0)
    below_top = colour(tone, [(11900, 0), (12000, -60)])
    bass = colour(tone, [(150, 0), (600, -20)])
    tone = bass + gain_from_db(middle_db) * (below_top - bass) + gain_from_db(top_db) * (tone - below_top)
    hum_phase = 2 * np.pi * np.cumsum(HUM_HZ + 1.2 * walk(9.7, N)) / SR
    hum = gain_from_db(HUM_DB + 69.5 + 0.52 * walk(17, N)) * np.sin(hum_phase)
    throb = np.hypot(swells(THROBS, TIME, 0.51, THROB_DROP_DB), gain_from_db(DRONE_DB + duck_db))
    mid, side = band(rng.standard_normal((2, N)), 82, 112)
    drone = unit(mid + 0.4 * side * opposed) * throb * gain_from_db(.7 * opposed)
    return (tone + hum) * gain_from_db(db + duck_db) + drone


# [f/Hz, level/dB]
MIC = [(20, -2.5), (7700, -0.5), (8250, -8.5), (9500, -3.5), (10300, 0), (16000, 3)]


def scene():
    hands = knocks() + ticks_and_grit() + taps() + scuff() + squeak() + strokes()
    return colour(shots() + hands, MIC) + air()


def top_cut(x):
    return signal.sosfilt(signal.butter(12, 15800, fs=SR, output="sos"), x)


def record(dry):
    return top_cut(dry)


dry = scene()
out = record(dry)
generate_wav(out)
```